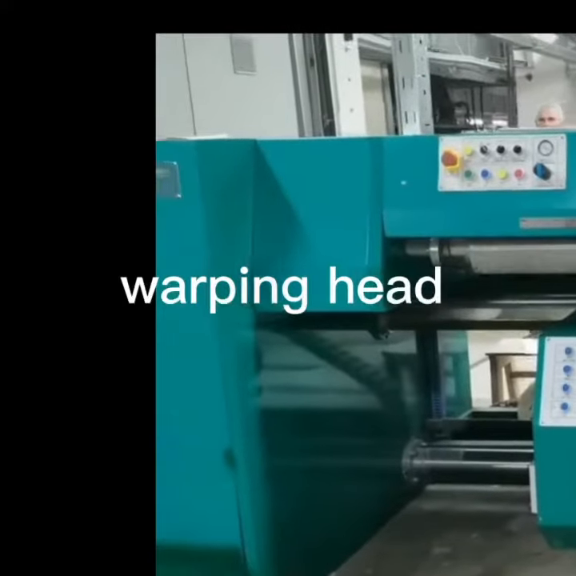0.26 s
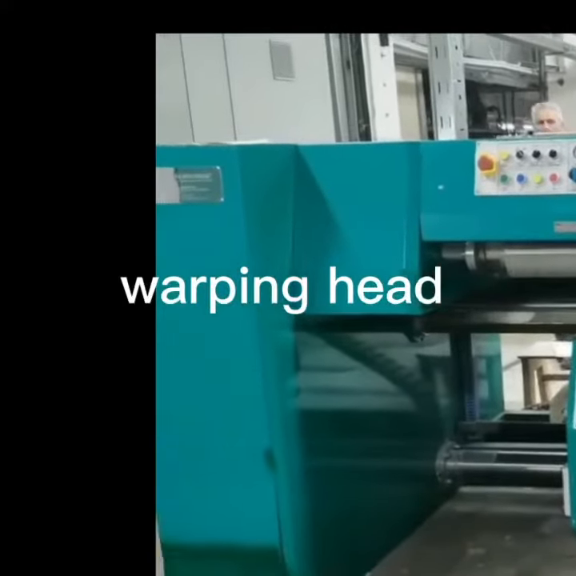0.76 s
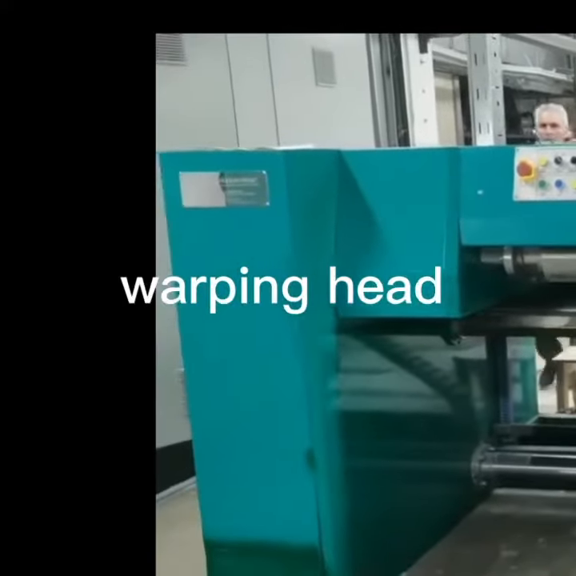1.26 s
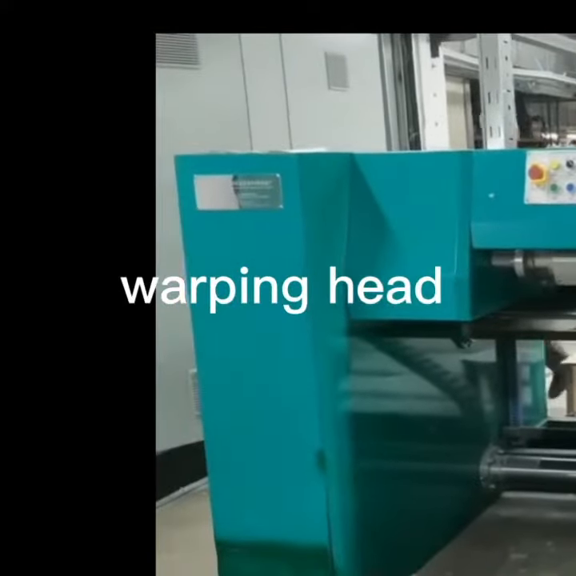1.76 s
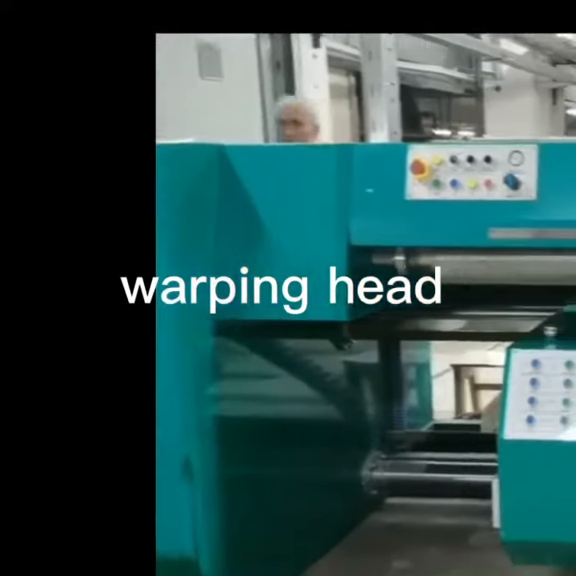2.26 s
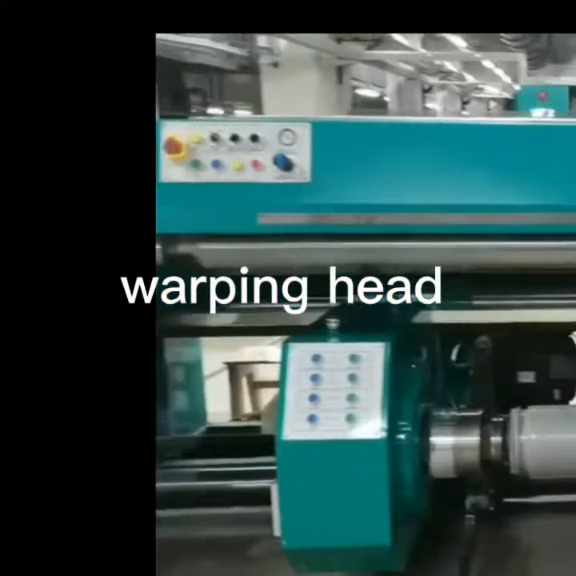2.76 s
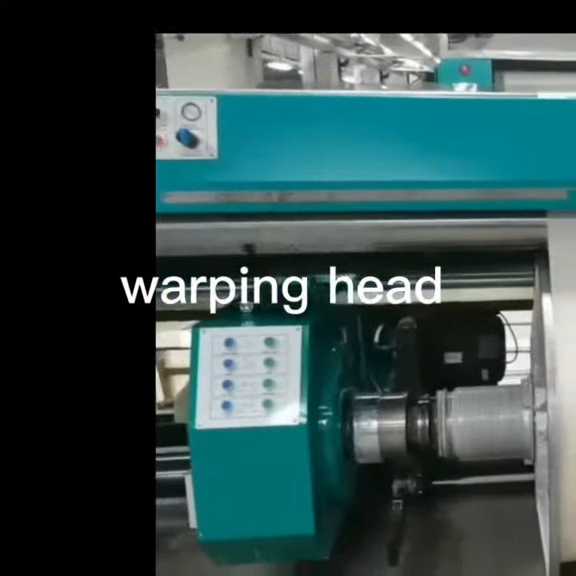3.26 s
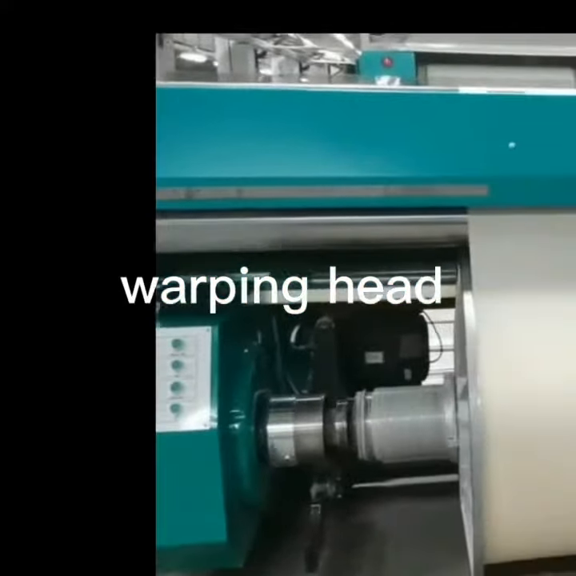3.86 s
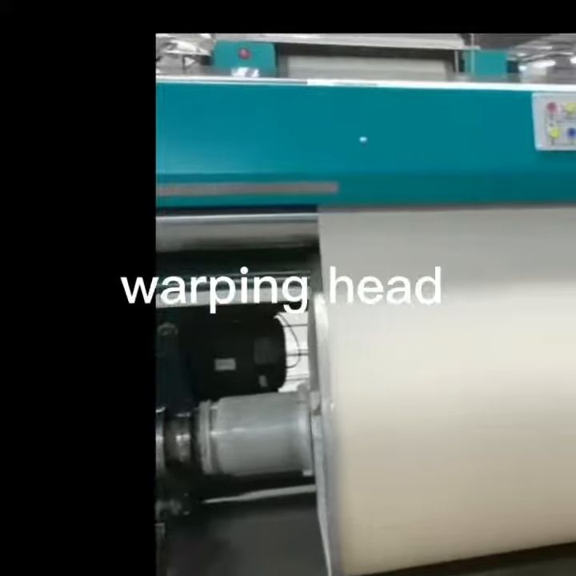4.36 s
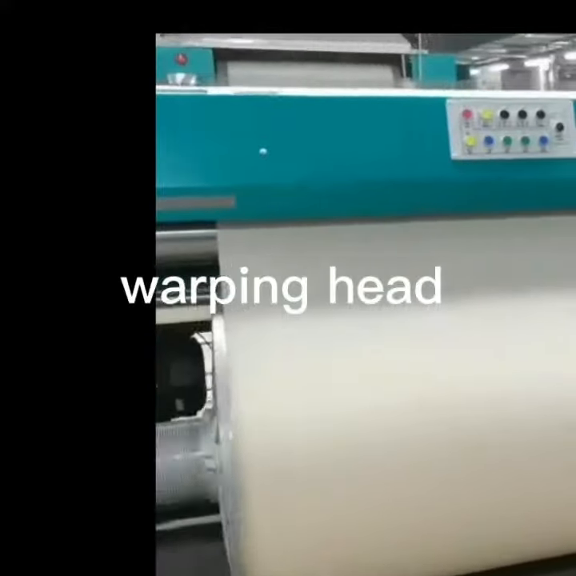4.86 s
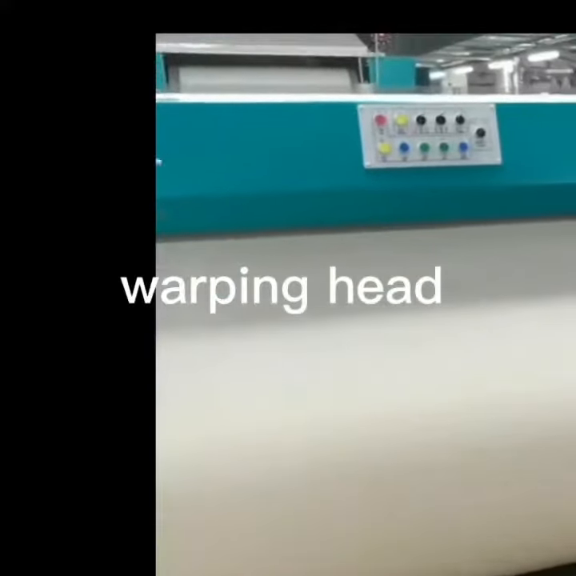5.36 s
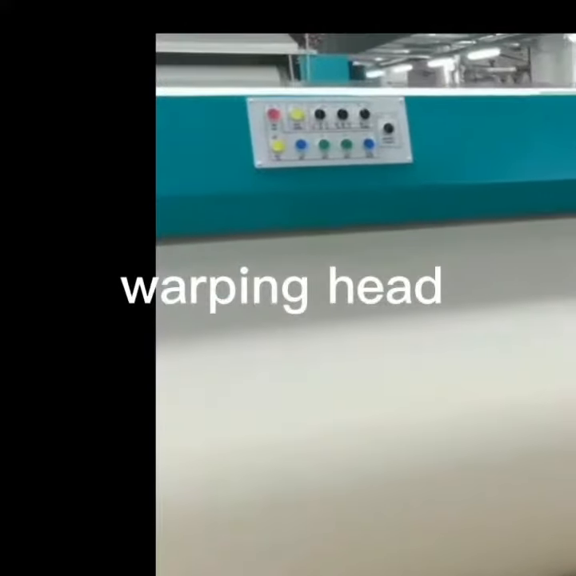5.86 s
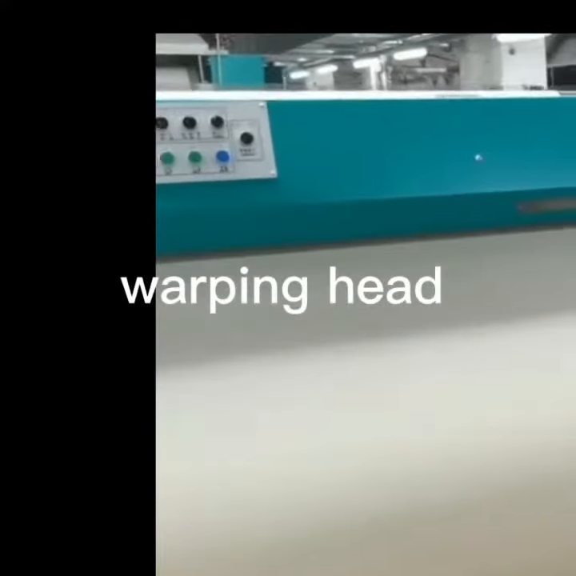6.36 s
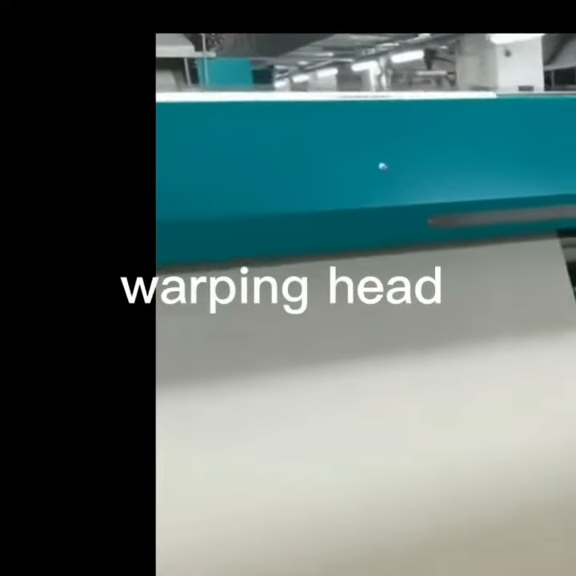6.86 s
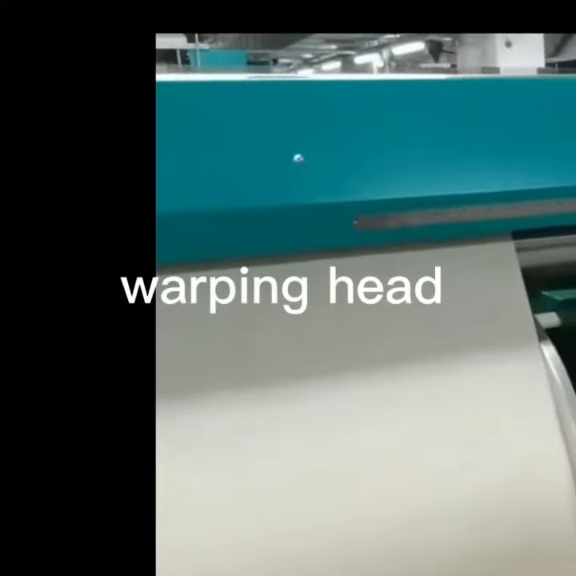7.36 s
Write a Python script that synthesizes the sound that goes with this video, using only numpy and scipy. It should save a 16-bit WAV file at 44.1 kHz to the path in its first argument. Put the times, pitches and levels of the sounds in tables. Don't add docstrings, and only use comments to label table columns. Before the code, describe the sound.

A dense, steady roar of mill machinery fills a large indoor hall from start to end, deep and boomy with soft air hiss above. A close motor hums low and steadily, wavering slightly, swelling near 1.8 s and sinking almost away around 7 s. Thin fan and gear tones fade in and out, barely above the roar. A very high, needle-thin electrical whine is plain at first, slowly sags, drops sharply around 2.3 s, then flickers, with brighter glints near 2.9, 5.7 and 6.4 s. Around 2.5 s the roar turns slightly duller, then slowly reopens. Rumble surges mildly at 1.5 and 4 s; a quick swell and hush pass between 5 and 5.7 s. Faint, short air puffs hiss at 1.3, 2.1, 2.4, 3.6, 5.4, 5.5 and 6.1 s. Handheld phone sound, muted grainy treble, no clear ending.

```python
import sys
import numpy as np
from scipy import signal
from scipy.fft import rfft, irfft, next_fast_len
from scipy.io import wavfile
from scipy.ndimage import uniform_filter1d

SR = 44100
rng = np.random.default_rng(int(sys.argv[2]) if len(sys.argv) > 2 else 0)


def digitize_waveform(pressure):
    field = np.atleast_2d(pressure).T
    bounded = np.clip(field, -1, 1)
    quanta = np.round(bounded * 32767).astype(np.int16)
    wavfile.write(sys.argv[1], SR, quanta)


def how_loud(loudness_db):
    steps = np.asarray(loudness_db, float) / 20
    return 10 ** steps


N = 336483
T = np.arange(N) / SR
CARRIER_HZ = 7999.9


def evened(x):
    return x / np.sqrt(np.mean(x ** 2) + 1e-20)


def read(points, hz):
    f, value = np.transpose(points)
    return np.interp(np.log(hz + 1), np.log(f + 1), value)


def columns(rows, t):
    centre_s, width_s, *db_columns = np.transpose(rows)
    coarse_t = t[::64]
    bells = np.exp(-((coarse_t[:, None] - centre_s) / np.maximum(width_s, .01)) ** 2)
    return [np.interp(t, coarse_t, bells @ db) for db in db_columns]


def drift(rate_hz):
    steps = rng.standard_normal(N // 128 + 2)
    slow = signal.lfilter(*signal.butter(2, rate_hz, fs=SR / 128), steps)
    return np.interp(np.arange(N) / 128, np.arange(len(steps)), evened(slow))


def tone(hz, level_db, waver, waver_hz):
    turn = np.exp(2j * np.pi * (hz * T + rng.random()))
    wander = 1 + waver * (drift(waver_hz) + 1j * drift(waver_hz))
    return how_loud(level_db) * np.sqrt(2 / (1 + 2 * waver ** 2)) * (turn * wander).real


# rumble, body and air hiss [dB].
SHADOW_DB = (-0.4, -2.2, -3.5)
# centre [s], half width [s], rumble [dB], body [dB].
SURGES = [
    (.5, 0.17, -0.5, 0),
    (.8, 0.091, -2, .3),
    (1.55, .25, 3, 1),
    (3.17, 0.12, -4, 0.8),
    (4.05, 0.19, 2.2, 0.3),
    (5.0, 0.078, 3, 0.7),
    (5.1, 0.055, -4.5, -1.5),
    (5.47, 0.11, 1.2, 3.5),
    (5.67, .05, -5.5, -2.5),
    (6.8, 0.098, 1, -1),
]


def roar_levels(t):
    shadow_s, edge_s, reopen_per_s = 2.5, 0.044, .07
    entered = np.clip((T - shadow_s) / edge_s + .5, 0, 1)
    shadow = entered * (1 - reopen_per_s * (T - shadow_s))
    rumble_db, body_db = columns(SURGES, T)
    rumble_loss, body_loss, hiss_loss = SHADOW_DB
    levels = (rumble_loss * shadow + rumble_db, body_loss * shadow + body_db, hiss_loss * shadow)
    return [np.interp(t, T, level) for level in levels]


# frequency [Hz], density [dB per Hz].
HALL = [(18, -33), (32, -10.5), (45, -1.5), (70, -1), (100, -2.5), (160, 3), (250, -2), (500, -8),
        (900, -15.5), (1300, -22.5), (1800, -25), (2600, -25.5), (3200, -30), (4400, -32)]
# centre [Hz], width [Hz], rise over the roar [dB].
COVERS = [
    (62, 31, 5),
    (143.9, 18, 2),
    (177.6, 38, -0.5),
    (352.2, 7.2, 3),
    (632, 12, 2),
    (1458, 41, 6),
    (3665, 450, 5),
]


def roar():
    hop, size = 512, 2048
    frames, hz = N // hop + 5, np.fft.rfftfreq(size, 1 / SR)
    a, b, patches = rng.standard_normal((frames, len(hz), 3)).T
    patches = uniform_filter1d(patches, size=20, axis=0)
    patches = evened(uniform_filter1d(patches, size=8, axis=1))
    levels = roar_levels(np.arange(frames) * hop / SR)
    rumble_db, body_db, hiss_db = (level - level.mean() for level in levels)
    low = read([(170, 0.89), (260, 0.093)], hz)[:, None]
    high = read([(900, 0.34), (1700, 1), (7500, 0.96), (8500, 0.63)], hz)[:, None]
    level_db = low * rumble_db + high * hiss_db + (1 - low - high) * body_db
    covers_db = sum(db / (1 + (2 * (hz - f) / width) ** 2) for f, width, db in COVERS)
    colour_db = read(HALL, hz) + covers_db
    field = (a + 1j * b) * how_loud(colour_db[:, None] + level_db + 1.18 * patches)
    noise = signal.istft(field, nperseg=size, noverlap=size - hop)[1][:N]
    return how_loud(-26.0) * evened(noise)


# start [s], peak [dB], length [s], lower edge [Hz], upper edge [Hz].
PUFFS = [
    (1.269, -44, 0.11, 890, 5940),
    (2.109, -44, 0.056, 2950, 7100),
    (2.42, -49.5, 0.076, 1210, 7100),
    (3.578, -48, 0.092, 4320, 6960),
    (5.363, -42.5, .1, 1220, 6900),
    (5.521, -52.5, 0.082, 2520, 6960),
    (6.137, -49, 0.16, 4330, 7030),
]


def valves():
    out = np.zeros(N + SR)
    t = np.arange(SR // 2) / SR
    rise_s, tail_s = 0.0067, 0.26
    for start_s, db, length_s, low_hz, top_hz in PUFFS:
        rise = np.clip(t / rise_s, 0, 1)
        tail = how_loud(-60 * np.maximum(t - length_s, 0) / tail_s)
        band = signal.butter(2, [low_hz, top_hz], "bandpass", fs=SR)
        hiss = evened(signal.lfilter(*band, rng.standard_normal(len(t))))
        out[round(start_s * SR):][:len(t)] += how_loud(db) * rise * tail * hiss
    return out[:N]


HUM = -29.5, [(.4, .05, -2.5), (1.15, .15, -2), (1.75, 0.14, 3.5), (2.3, 0.061, -4.0), (3.2, 0.053, -4.5),
       (3.4, 0.12, 2.5), (5.15, .09, -8.5), (6.4, 0.14, -5), (7.05, 0.34, -20)]
BLADES = [
    (-43.0, [(2.75, 0.29, 5.5), (3.1, .1, -15), (3.7, .3, 3), (6.0, .4, -15), (6.75, 0.23, 2), (7.2, 0.16, -8)]),
    (-44.5, [(.25, 0.19, 6.5), (1.35, .1, -8.0), (2.97, .12, 6.0), (4.05, 0.26, 6.5), (5.8, 0.24, -7), (6.9, 0.45, 6.5)]),
    (-47.5, [(3.3, 0.23, -10.5), (5.3, 0.58, -19), (7.1, 0.77, -9.5)]),
    (-49.5, [(1.5, .15, 8.0), (2.65, 0.15, 9.8), (3.8, 0.13, 11.0), (5.25, 0.11, 15), (5.58, 0.13, 11), (6.87, 0.089, 6.3)]),
]
TEETH = [
    (-57, [(.3, 0.25, 5.8), (2.42, .1, 6.5), (3.95, 0.088, 5.0), (7.4, 0.21, 9)]),
    (-58, [(3.6, 0.33, 5.0), (4.68, .2, 10.5), (5.3, 0.18, -7), (5.77, 0.11, 10), (6.8, .15, 11.5)]),
    (-51.0, [(2.4, 0.11, 4.5), (3.6, 0.33, 2.5), (5.05, 0.19, 5.5), (5.57, 0.16, -7), (6.52, .1, -9), (7.05, 0.11, 7.0), (7.35, 0.091, -2)]),
]


def standing_tone(hz, waves, waver, waver_hz):
    usual_db, crests = waves
    return tone(hz, usual_db + columns(crests, T)[0], waver, waver_hz)


def motor():
    return standing_tone(215.8, HUM, waver=0.091, waver_hz=5.5)


def fans():
    blades_hz = (437.0, 474.7, 901.8, 356.0)
    return sum(standing_tone(hz, waves, waver=.3, waver_hz=5.0) for hz, waves in zip(blades_hz, BLADES))


def gears():
    tooth_hz = 211.74
    return sum(standing_tone(k * tooth_hz, waves, waver=.15, waver_hz=4.0)
               for k, waves in zip(range(4, 7), TEETH))


# centre [s], half width [s], rise or dip [dB].
WHINE = [(2.35, .04, -7), (2.7, .03, -7.0), (2.92, 0.14, 8.5), (3.25, .07, -9), (3.7, .05, 6.0),
         (4.02, 0.11, 7), (4.45, .06, -8), (4.6, 0.037, 5.0), (4.8, 0.098, -8.5), (5.08, .14, 7.5),
         (5.42, .04, 4.0), (5.72, .09, 13.0), (5.87, 0.028, 4), (6.13, .03, 7), (6.4, .07, 10.5),
         (6.55, .03, 3.5), (6.7, .04, -10), (6.92, .12, 3.5), (7.12, .04, -7.0), (7.24, .03, 8),
         (7.42, .07, -10), (7.62, .04, 6)]
# offset from it [Hz], level relative to a fixed -39 dB [dB].
SIDES = [
    (-301, -25),
    (-183, -24),
    (166, -22),
    (300, -22),
    (463, -30),
    (603, -33),
]


def inverter():
    seen_db, sag_db_per_s = -30.5, -1.94
    hidden_s, hidden_db = 2.28, -43
    seen_waver, hidden_waver = .12, 0.31
    hidden = np.clip((T - hidden_s) / 0.085 + .5, 0, 1)
    level_db = (1 - hidden) * (seen_db + sag_db_per_s * T) + hidden * hidden_db + columns(WHINE, T)[0]
    waver = seen_waver + (hidden_waver - seen_waver) * hidden
    carrier = tone(CARRIER_HZ, level_db, waver=waver, waver_hz=24.6)
    skirt = tone(CARRIER_HZ, -48.0, waver=4.4, waver_hz=70.4)
    sides = sum(tone(CARRIER_HZ + hz, -39 + db, waver=.9, waver_hz=6.0) for hz, db in SIDES)
    return carrier + skirt + sides


def scene():
    return (roar() + valves() + motor() + fans() + gears() + inverter())[None]


# frequency [Hz], step [dB of a transform line].
STEPS = [(100, -1), (1000, -5.5), (1800, -7.7), (3000, -10), (4000, -11.5), (4900, -10.6), (6400, -13),
         (7200, -12.3), (8600, -12.5), (9300, -18), (10700, -22), (12000, -24), (12700, -24.5),
         (13400, -27), (13900, -24)]
# bands above the tone, step relative to the tone's band [dB].
HIDING = [
    (0, -30),
    (-3, -16),
    (3, -20),
    (3.5, -32.5),
    (8.5, -10),
    (5, -34),
]


def phone_rounding(x):
    hop, lines, wide, grid = 1024, 672, 32, 299
    lead = hop - grid
    slope = np.kaiser(hop + 1, 4 * np.pi)
    slope = np.sqrt(np.cumsum(slope[:hop]) / slope.sum())
    window = np.r_[slope, slope[::-1]][:, None]
    n, k = np.arange(2 * hop)[:, None], np.arange(lines)
    basis = np.cos(np.pi / hop * (n + .5 + hop / 2) * (k + .5)) * window
    blocks = np.pad(x, (lead, 2 * hop - (lead + N) % hop)).reshape(-1, hop)
    z = np.hstack([blocks[:-1], blocks[1:]]) @ basis
    hz, band = (k + .5) * SR / 2 / hop, k // wide
    centre_hz = np.where(hz > 6900, (band + .5) * wide * SR / 2 / hop, hz)

    mid_db = 10 * np.log10((z[:, 70:320] ** 2).mean(axis=1) + 1e-12)
    luck = rng.standard_normal((len(z), 4))
    frame_db = .3 * (mid_db - mid_db.mean()) + 2.2 * uniform_filter1d(luck[:, 0], size=3)
    whine_band = int(CARRIER_HZ / hz[0] / 2) // wide
    whine_db = 10 * np.log10((z[:, band == whine_band] ** 2).sum(axis=1) + 1e-12)
    hiding_db = np.interp(band - whine_band, *np.transpose(HIDING), left=-99, right=-99)
    step = np.maximum(how_loud(read(STEPS, centre_hz)), how_loud(whine_db[:, None] + hiding_db))
    step = step * how_loud(frame_db)[:, None]
    band_luck = uniform_filter1d(rng.standard_normal((len(z), 21)), size=2, axis=0)
    step *= how_loud(1.2 * band_luck[:, band])
    rounded = np.sign(z) * step * np.floor(abs(z / step) ** .75 + .4054) ** (4 / 3)

    pairs = luck[np.arange(len(z)) // 2 * 2]
    reach = 3.0 * (pairs[:, 1:2] - .62)
    off_centre = abs(band - whine_band - 4.0 - 2.5 * pairs[:, 2:3])
    as_noise = (off_centre < reach) & (band > whine_band) & (hz < 13800)
    z = np.where(as_noise, how_loud(-2.5) * z, rounded) * (hz < 14050)

    halves = (z @ basis.T * 2 / hop).reshape(-1, 2, hop)
    first = np.pad(halves[:, 0], ((0, 1), (0, 0)))
    second = np.pad(halves[:, 1], ((1, 0), (0, 0)))
    return (first + second).ravel()[lead:lead + N]


# frequency [Hz], gain [dB].
MIC = [(4400, 0.83), (4870, -6.5), (5450, -4), (6600, 0), (7300, -7.5), (7520, -13), (8800, -13.5),
       (9050, -10), (10500, -18), (12100, -18.5), (12450, -24), (13200, -18.5), (13800, -27), (15000, -26)]


def microphone(dry):
    size = next_fast_len(N)
    gain = how_loud(read(MIC, np.fft.rfftfreq(size, 1 / SR)))
    coloured = irfft(rfft(dry, size) * gain, size)[0, :N]
    return signal.lfilter(*signal.butter(2, 30, "highpass", fs=SR), coloured)


def band_limit(x):
    return signal.sosfilt(signal.butter(12, 14060, fs=SR, output="sos"), x)


def record(dry):
    mix = phone_rounding(microphone(dry))[None]
    return band_limit(mix)


dry = scene()
out = record(dry)
digitize_waveform(out)
```